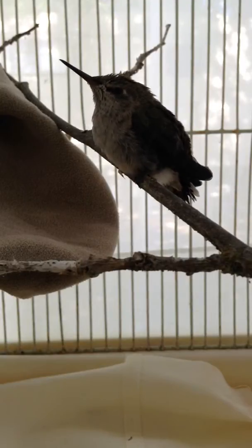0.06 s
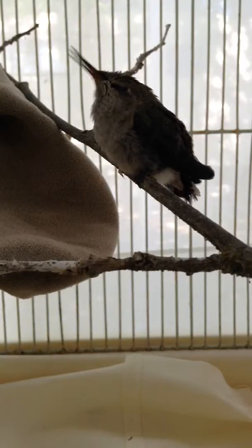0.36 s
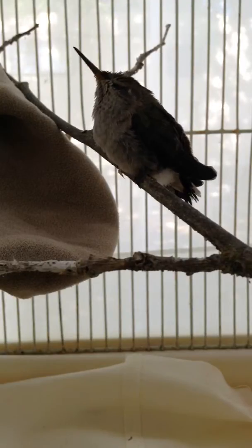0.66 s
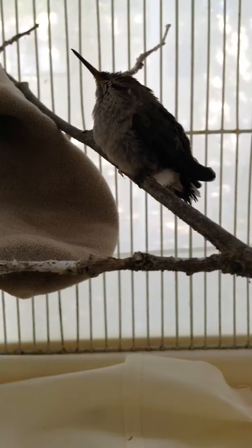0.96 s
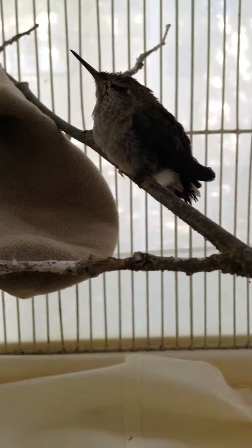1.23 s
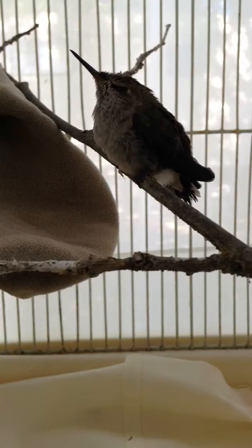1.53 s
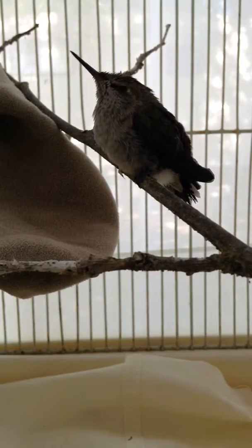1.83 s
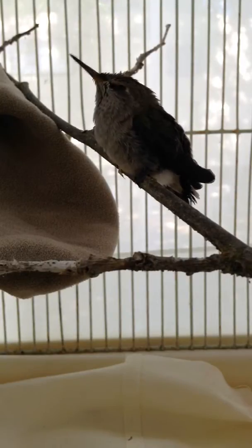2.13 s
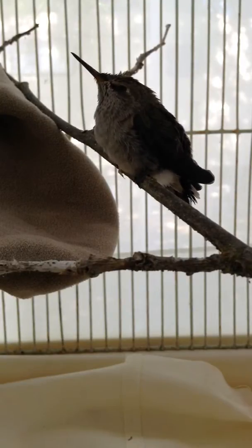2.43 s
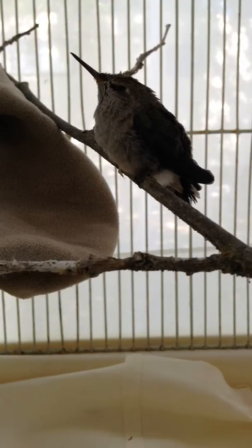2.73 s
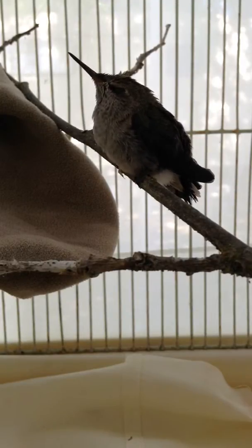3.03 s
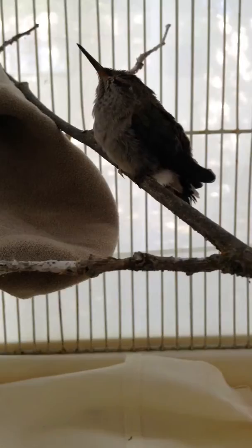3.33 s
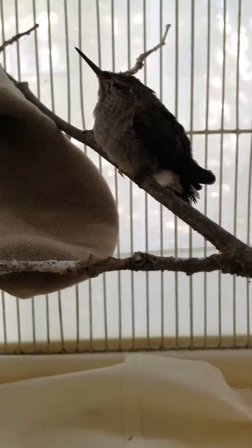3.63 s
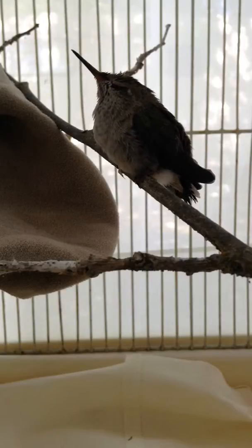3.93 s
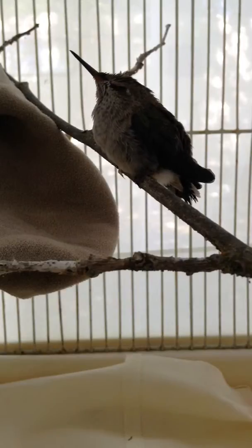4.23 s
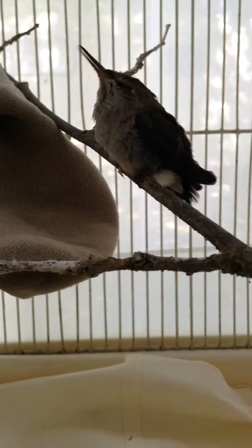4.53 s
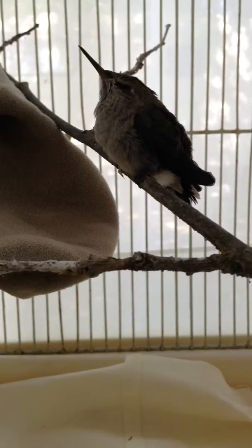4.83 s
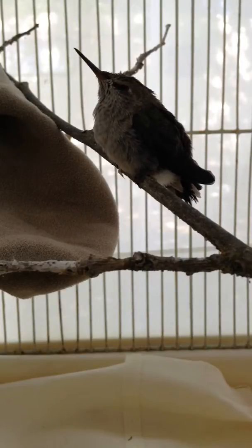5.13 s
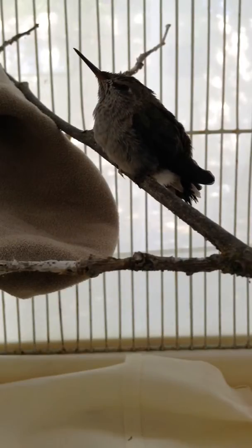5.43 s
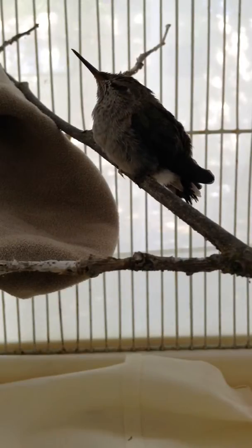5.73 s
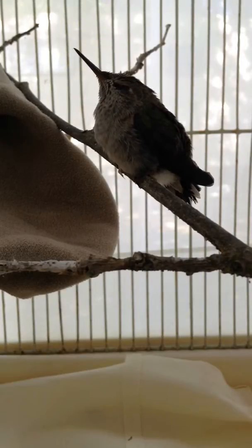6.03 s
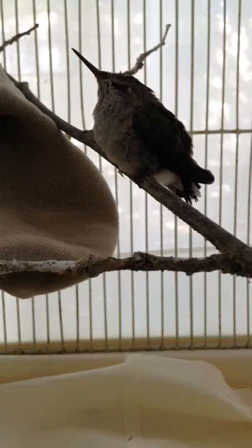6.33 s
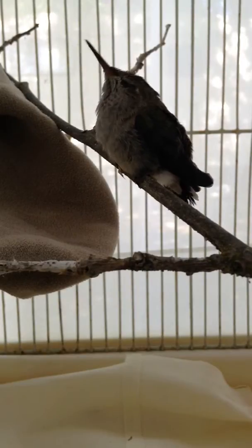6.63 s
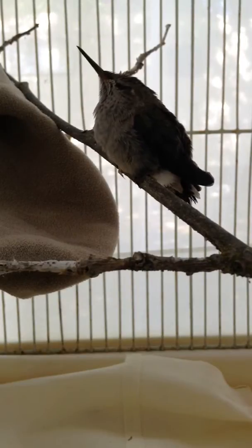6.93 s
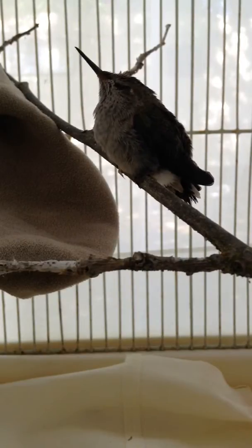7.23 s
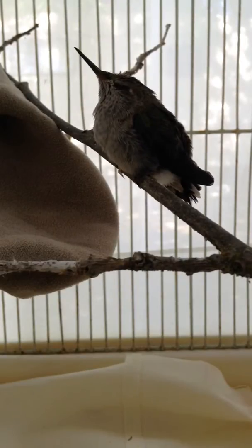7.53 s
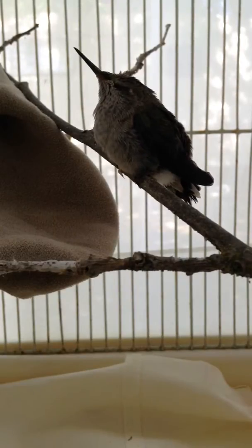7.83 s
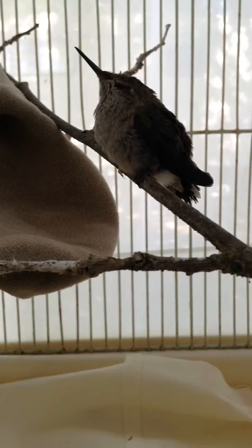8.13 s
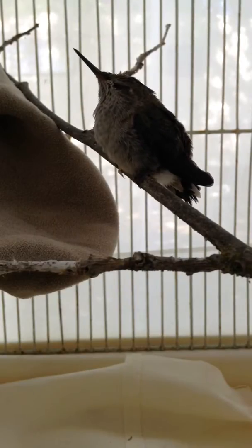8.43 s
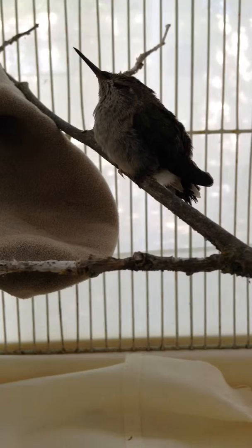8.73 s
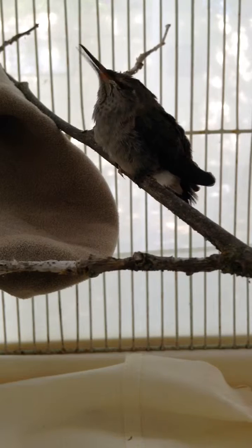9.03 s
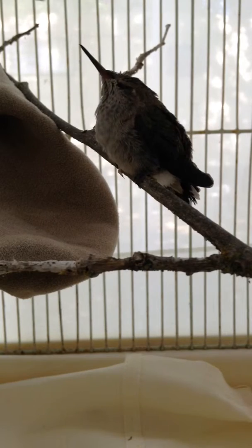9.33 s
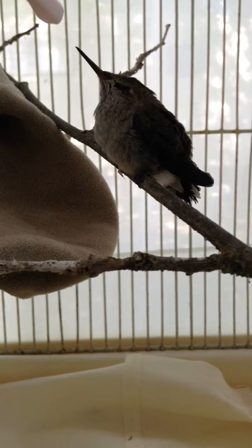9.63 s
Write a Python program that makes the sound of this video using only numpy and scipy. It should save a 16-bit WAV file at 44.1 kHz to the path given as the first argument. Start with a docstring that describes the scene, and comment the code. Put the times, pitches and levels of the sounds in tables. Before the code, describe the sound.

In a quiet, echoing house, a small young bird makes loud, thin, very high single chips, close and almost dry, with pauses between them. A more distant bird joins after about three seconds with four soft, rising rasps, evenly spaced. Underneath are a low hush of air, faint sliding bird whistles and a few slight rustles. Some faint dull bumps and two muffled thuds come late, around the last chip.

```python
"""A quiet, echoing house: close by, a young caged hummingbird gives six piercing chips.
Each is a near-pure tone that swings as the voice starts and sags as the breath runs out.
Farther off another bird answers with four rising calls, chopped into a rasp by uneven pulses.
Thin whistles slide by over a bed of soft air and faint hums from outside.
Grainy noise makes the dry rustles, muffled bands of noise the dull bumps and two heavier thuds."""
import sys
import numpy as np
from scipy import signal
from scipy.fft import rfft, irfft
from scipy.io import wavfile

SR = 44100
rng = np.random.default_rng(int(sys.argv[2]) if len(sys.argv) > 2 else 0)


def log_audio(samples):
    """Write samples as a 16-bit WAV file to the path given in sys.argv[1]."""
    # one column per channel
    frames = np.atleast_2d(samples).T
    # limit to full scale, then quantise
    limited = np.clip(frames, -1, 1)
    pcm = np.round(limited * 32767).astype(np.int16)
    wavfile.write(sys.argv[1], SR, pcm)


N = 430857

# Levels in the tables are set ahead of the filters and the faders in scene().
# reverb time of the house: f/Hz, t60/s
ROOM_DECAY = [(200, 0.7), (1000, 1.5), (3000, 1.004), (4500, 0.89), (6000, .52), (7600, 0.32),
              (10000, 0.53), (15000, 0.2)]
# narrow room resonances: f/Hz, level/dB, t60/s
ROOM_MODES = [(2690, 0.5, 1.1), (2786, -4, 1), (2917, -0.5, 1.2), (2963, -3, 1.1), (3160, -4, 1.1),
              (3144, 5, 1.3), (3199, -2, 1.2)]
# EQ of the air bed: f/Hz, level/dB
AIR_EQ = [(20, -79.5), (50, -36), (100, -16), (165, -1.5), (260, -1.5), (380, -6.5), (560, -8.5),
          (780, -4.5), (1070, 0), (1600, -7.3), (2500, -10.5), (4000, -16), (5500, -19.5), (15000, -24)]
# faint hums outside: t/s, length/s, level/dB, first f/Hz, last f/Hz, mid-glide bow/Hz
HUMS = [(2.66, 0.27, -68, 531, 539, 0.5), (2.7, 1.9, -80.5, 539, 448, -21.5),
        (3.6, 3.0, -78.5, 166.9, 169.4, 0)]
# distant slurred whistles: t/s, length/s, level/dB, first f/Hz, last f/Hz, mid-glide bow/Hz
WHISTLES = [(0.0, 0.11, -59, 3480, 3340, -51), (.93, 0.12, -57.5, 5920, 5980, -1),
            (1.132, 0.17, -52, 5070, 4070, -200), (1.295, 0.23, -52.5, 3897, 3820, -130),
            (1.536, 0.21, -68, 3460, 3310, -38.5), (1.946, 0.39, -66, 4050, 3650, -29),
            (3.017, 0.43, -64.5, 4350, 3750, 108), (3.141, .14, -54.5, 5350, 4670, -100),
            (3.27, 0.19, -52, 5020, 4350, -100), (3.527, 0.14, -56, 4150, 3610, -22.5),
            (4.153, .11, -62, 3400, 3500, 400), (4.26, .1, -63, 3450, 3750, 280),
            (5.125, 0.12, -53, 4010, 3810, -52), (5.241, .1, -59.5, 3920, 4270, 29),
            (5.307, 0.14, -59.5, 4190, 3300, -370), (6.117, 0.055, -54.5, 3640, 4330, 82),
            (6.195, 0.13, -61, 4370, 3900, 111.5), (6.924, .34, -59.5, 4530, 3690, -180),
            (7.611, .23, -57, 3000, 3330, 230), (7.83, .19, -63, 3330, 2680, -170),
            (8.222, 0.43, -70, 3590, 4260, -4), (8.541, 0.15, -63.5, 3790, 3230, -150),
            (8.932, 0.19, -66, 4800, 4870, 81.5), (9.08, 0.2, -58.5, 4850, 4400, 3),
            (9.31, 0.38, -64, 4150, 3334, -130)]
# light bumps: t/s, boom level/dB, knock level/dB, knock rise/s, knock f/Hz, knock width/octaves
BUMPS = [(1.96, -76, -63, 0.037, 768, 0.16), (6.853, -65, -58.5, 0.004, 962, .39),
         (6.925, -64.5, -65, 0.017, 768, .08), (7.185, -63, -65, 0.017, 936, .42),
         (7.491, -66, -77.5, .02, 850, .3), (9.628, -64, -73, 0.022, 850, .3)]
# heavy thuds: t/s, level/dB, extra weight/dB
THUDS = [(8.765, -52, -3.5), (9.268, -52, 1)]
# layers of a thud (first touch, clack, body, lingering rumble, hollow note):
# delay/s, level/dB, share of the extra weight, rise/s, t60/s, f/Hz, width/octaves
THUD_LAYERS = [(-0.043, -9.5, 0.065, .019, 0.2, 207, .39), (-0.01, -2, 0.19, 0.026, 0.39, 890, .42),
               (0.038, 1.8, 1, .02, .25, 340, 0.61), (0.083, -5, 0.3, 0.028, 1, 780, 0.84),
               (0.11, -8.5, 0.95, 0.031, .7, 655, 0.089)]
# dry rustles: t/s, level/dB, rise/s, t60/s, centre f/Hz
RUSTLES = [(0.059, -52.5, 0.044, 0.34, 4530), (.24, -59.5, 0.12, 0.35, 3020), (0.749, -64, .2, 0.33, 3720),
           (0.966, -53.5, 0.057, 0.18, 4900), (1.013, -52.5, .02, 0.06, 3280),
           (1.159, -60, .012, 0.16, 2370), (2.049, -67.5, .04, 0.81, 3420), (2.586, -46, 0.013, 0.21, 4040),
           (2.952, -68, 0.0087, 0.21, 5550), (4.148, -63.5, 0.026, 0.47, 3410),
           (5.198, -67.5, 0.028, 0.18, 4800), (6.593, -60, 0.033, 0.27, 4300),
           (8.14, -72.5, 0.45, 1.14, 3034), (9.118, -50, 0.0089, 0.34, 4200),
           (9.717, -60.5, 0.031, .3, 4100)]
# EQ of a rustle: ratio to its centre frequency, level/dB
RUSTLE_EQ = [(.15, -32), (.4, -14.5), (.62, -8.5), (.85, -5), (1.12, -2.5), (1.3, -9.5), (1.45, -18.5),
             (2.3, -28), (3.6, -42)]
# the far bird's calls: t/s, length/s, level/dB, top f/Hz, brightness/dB per harmonic, yip level/dB
RASPS = [(3.186, 0.3, -41.5, 3026, 2, -41), (4.441, .300, -37, 3117, 4, -42.5),
         (5.733, .315, -38, 3090, 4, -41.5), (6.988, .305, -39.5, 3081, 4.5, -40.5)]
# short squeaks around the starts of two calls: t/s, length/s, f/Hz, level/dB
SQUEAKS = [(4.406, 0.013, 5760, -39.5), (5.693, 0.026, 5780, -57), (5.769, 0.033, 5800, -55)]
# resonances of the far bird's throat: f/Hz, level/dB
THROAT_EQ = [(1600, -9), (2050, -3.5), (2600, 0), (2950, -1), (3150, 4), (3400, 1), (4200, -1), (5400, 4),
             (6200, -1.5), (6900, -24.5), (7700, 6), (8500, 4), (9400, -7), (10500, -16.5), (12400, 0)]
# the hummingbird's chips, and the faint overload ticks heard on each:
# t/s, length/s, level/dB, f/Hz, overload tick level/dB, three pitch swings/Hz
CHIPS = [(0.4617, 0.082, -3, 7593, -58, 620, -43, 71.5),
         (2.0710, 0.084, -2.5, 7633, -58.5, 195, -320, -2.5),
         (3.253, 0.092, -2.5, 7615, -65.5, 50.5, -350, 4),
         (4.4978, 0.099, -3.5, 7577, -55.5, 155, -420, 245.5),
         (6.503, 0.089, -4.5, 7630, -60.5, 614, -560, 381.5),
         (9.011, 0.086, -1.5, 7630, -64.5, -57, 204, 14)]
# timing of the three swings within a chip: t/s, width/s
SWING_TIMES = [(.001, .0025), (.0055, .003), (0.013, .0055)]
# the bill's colour on a chip's octave: f/Hz, level/dB
BILL_EQ = [(13500, -14), (14400, -1.5), (15200, 2.5), (15600, -4), (16100, -28)]


def amp(db):
    """Decibels to gain."""
    return 10 ** (np.asarray(db) / 20)


def unit_rms(x):
    """Scales to rms 1."""
    return x / np.sqrt(np.mean(x ** 2) + 1e-20)


def curve(points, hz):
    """Reads a table on a log-frequency axis."""
    f, value = np.transpose(points)
    return np.interp(np.log(hz + 1e-6), np.log(f), value)


def hump(t, centre, width):
    """A bell-shaped envelope of height 1."""
    return np.exp(-((t - centre) / width) ** 2)


def hit_envelope(rise, t60):
    """One second of envelope: linear attack, exponential decay."""
    t = np.arange(SR) / SR
    return np.minimum(t / rise, 1) * amp(-60 * np.maximum(t - rise, 0) / t60)


def eq(x, colour):
    """Filters x by colour(Hz), given in dB."""
    hz = np.fft.rfftfreq(len(x), 1 / SR) + 1
    return irfft(rfft(x) * amp(colour(hz)), len(x))


def noise(size, colour):
    """Noise of rms 1, shaped by colour(Hz) in dB."""
    return unit_rms(eq(rng.standard_normal(size), colour))


def wander(size, rate_hz):
    """Random modulation that rolls off above rate_hz."""
    return noise(size, lambda hz: -20 * np.log10(1 + (hz / rate_hz) ** 2))


def add(mix, start, sound):
    """Lays a sound into the mix at start, in seconds."""
    part = mix[max(round(start * SR), 0):][:len(sound)]
    part += sound[:len(part)]


def track(source, cues):
    """One sound for each row of a cue table."""
    mix = np.zeros(N)
    for cue in cues:
        add(mix, *source(*cue))
    return mix


def reflect(x, echo_db, spread_s, count=14):
    """Adds early reflections off nearby surfaces: glides ripple and fast pulses blur."""
    out = x.copy()
    for delay, sign in zip(rng.uniform(0.0024, spread_s, count), rng.choice([-1, 1], count)):
        add(out, delay, sign * amp(echo_db) * x)
    return out


def reverb(x, predelay_s):
    """The diffuse tail of the house; each band dies at its own speed."""
    taps = rng.standard_normal(SR) * (rng.random(SR) < .2) * (np.arange(SR) > predelay_s * SR)
    hz, t, bands = signal.stft(taps, SR, nperseg=256)
    decay = amp(-60 * t / curve(ROOM_DECAY, hz)[:, None])
    tail = signal.istft(bands * decay, SR, nperseg=256)[1]
    return signal.fftconvolve(x, tail / np.linalg.norm(tail))[:N]


def room_ring(x):
    """Narrow room resonances that sing on after a call."""
    t = np.arange(SR) / SR
    modes = np.zeros(SR)
    for hz, db, t60 in ROOM_MODES:
        unity_gain = 2 * np.log(1000) / (t60 * SR)
        modes += unity_gain * amp(db - 60 * t / t60) * np.sin(2 * np.pi * hz * t)
    return signal.fftconvolve(x, modes)[:N]


def air():
    """Room tone: a soft, dark noise bed whose level drifts slowly."""
    return amp(-67.5 + .5 * wander(N, 0.67)) * noise(N, lambda hz: curve(AIR_EQ, hz))


def gliding_tone(start, length, db, first_hz, last_hz, bow_hz):
    """A whistle or hum: one unsteady tone on a curved glide, hoarser when it is softer."""
    attack, release, flutter_db = .15, .3, 2.8  # attack and release are shares of the length
    progress = np.linspace(0, 1, int(length * SR))
    hz = first_hz + (last_hz - first_hz) * progress + bow_hz * (1 - (2 * progress - 1) ** 2)
    envelope = np.minimum(progress / attack, 1) * np.minimum((1 - progress) / release, 1)
    hoarseness = np.clip(-(db + 52) / 12, 0, 1)
    waver = .01 * wander(len(hz), 120) + .022 * hoarseness * wander(len(hz), 350)
    phase = 2 * np.pi * np.cumsum(hz * (1 + waver)) / SR
    flutter = amp(flutter_db * wander(len(hz), 40))
    return start, amp(db) * envelope * unit_rms(np.sin(phase) * flutter)


def muffled_hit(db, rise, t60, centre_hz, octaves):
    """A blow heard through walls: a resonant band of noise with a soft attack and no top end."""
    body = noise(SR, lambda hz: -20 * np.log10(1 + (np.log2(hz / centre_hz) / octaves) ** 2 / 2))
    body = eq(body, lambda hz: -10 * np.log10(1 + (160 / hz) ** 10 + (hz / 3000) ** 4))
    return amp(db) * body * hit_envelope(rise, t60)


def bump(start, boom_db, knock_db, rise, centre_hz, octaves):
    """A light bump: a low boom layered with a hollow knock."""
    boom = muffled_hit(boom_db, rise=.025, t60=.23, centre_hz=242, octaves=.16)
    knock = muffled_hit(knock_db, rise, t60=.13, centre_hz=centre_hz, octaves=octaves)
    return start, boom + knock


def thuds():
    """Heavy thuds, each a staggered stack of muffled hits."""
    mix = np.zeros(N)
    for start, db, weight_db in THUDS:
        for delay, layer_db, share, *shape in THUD_LAYERS:
            add(mix, start + delay, muffled_hit(db + layer_db + share * weight_db, *shape))
    return mix


def rustle(start, db, rise, t60, centre_hz):
    """A dry, grainy scrape that swells and dies."""
    grain = amp(3 * wander(SR, 130))
    scrape = unit_rms(grain * noise(SR, lambda hz: curve(RUSTLE_EQ, hz / centre_hz)))
    return start, amp(db) * scrape * hit_envelope(rise, t60)


def squeak(start, length, hz, db):
    """A brief pure tone that swells and fades."""
    t = np.arange(int(length * SR)) / SR
    return start, amp(db) * np.sin(2 * np.pi * hz * t) * np.sin(np.pi * t / length)


def yip(rasp_start, db):
    """The quick, rough upward pickup to a rasp, with weak harmonics."""
    lead_s, length, from_hz, to_hz = .044, .021, 2000, 2830
    t = np.arange(int(length * SR)) / SR
    progress = t / length
    hz = from_hz + (to_hz - from_hz) * (1 - (1 - progress) ** 3)
    swell_db = -4.5 + 5.5 * np.sin(np.pi * progress)
    phase = 2 * np.pi * np.cumsum(hz * (1 + 0.043 * wander(len(t), 560))) / SR
    tone = sum(amp(level) * np.sin(k * phase) for k, level in enumerate([0, -21, -31], 1))
    rough_tone = unit_rms(tone * amp(3.5 * wander(len(t), 300)))
    return rasp_start - lead_s, amp(db + swell_db) * rough_tone * signal.windows.tukey(len(t), .06)


def rasp(start, length, db, top_hz, bright_db, pulse_hz=118):
    """The far bird: a rising, brightening note chopped into uneven pulses, each with a pitch swoop."""
    t = np.arange(int(length * SR)) / SR
    progress = t / length
    # the voice pushes off, catches for an instant, then swells late in the call
    push_db = 4 * np.exp(-t / .016)
    catch_db = -17 * hump(t, .02, .0068)
    swell_db = -4.5 + 5.5 * hump(progress, .77, .22)
    pitch_ratio = .85 + .15 * np.minimum(progress / .76, 1) ** 1.3
    pulse_phase = 2 * np.pi * np.cumsum(pulse_hz * (1 + .25 * wander(len(t), 80))) / SR
    pulses = unit_rms(np.exp(1.3 * np.cos(pulse_phase) + 0.22 * wander(len(t), 100)))
    swoop = 0.027 * np.sin(pulse_phase) + .024 * wander(len(t), 270)
    phase = 2 * np.pi * np.cumsum(top_hz * pitch_ratio * (1 - swoop / pitch_ratio ** 3)) / SR
    tilt_db = -19.5 + 13.5 * progress ** 3 + bright_db
    harmonics_db = [0, tilt_db - 1.5, 2 * tilt_db + 4, 2 * tilt_db - 20]
    tone = sum(amp(level) * np.sin(k * phase) for k, level in enumerate(harmonics_db, 1))
    fades = np.clip((length - t) / .03, 0, 1) * signal.windows.tukey(len(t), .01)
    return start, amp(db + push_db + catch_db + swell_db) * pulses * tone * fades


def overload_ticks(t, count=5, from_s=.014, to_s=.032):
    """Faint overload ticks heard on each loud chip: a few dull clicks at random early moments."""
    clicks = np.zeros(len(t))
    clicks[np.searchsorted(t, rng.uniform(from_s, to_s, count))] = 1
    return unit_rms(eq(clicks, lambda hz: -10 * np.log10((1 + hz / 250) * (1 + (hz / 9000) ** 4))))


def chip(start, length, db, pitch_hz, tick_db, *swings_hz):
    """The hummingbird: a near-pure note that swings at the onset, settles, sags and gains an octave."""
    attack_s, release_s = .015, .011
    t = np.arange(int(length * SR)) / SR
    progress = t / length
    attack = np.sin(np.pi / 2 * np.minimum(t / attack_s, 1))
    release = np.minimum((length - t) / release_s, 1)
    envelope = attack * release * (1 - .75 * progress ** 2) * signal.windows.tukey(len(t), .025)
    sag_hz = 374 * progress ** 3  # the breath runs out
    swing_hz = sum(hz * hump(t, at, width) for hz, (at, width) in zip(swings_hz, SWING_TIMES))
    hz = pitch_hz - sag_hz + swing_hz + 18 * wander(len(t), 90)
    onset_strain = 0.057 * hump(t, 0, .028) * wander(len(t), 380)
    phase = 2 * np.pi * np.cumsum(hz) / SR + onset_strain
    octave_db = -16.5 - 13.5 * hump(t, .012, .013)  # dips while the chip is strongest
    octave = eq(amp(octave_db) * release * np.sin(2 * phase), lambda f: curve(BILL_EQ, f))
    quaver_db = 1.2 * progress * noise(len(t), lambda f: -10 * np.log10(1 + (f / 150) ** 8))
    tone_with_ticks = np.sin(phase) + octave + amp(tick_db) * overload_ticks(t)
    return start, amp(db + quaver_db) * envelope * tone_with_ticks


def scene():
    """The mono mix: chips up front and almost dry; calls, whistles, rustles and bumps set back, wet."""
    chips = amp(0.07) * reflect(track(chip, CHIPS), echo_db=-28.5, spread_s=.014)
    rasps = track(rasp, [cue[:-1] for cue in RASPS])
    yips = track(yip, [(cue[0], cue[-1]) for cue in RASPS])
    calls = eq(rasps + yips, lambda hz: curve(THROAT_EQ, hz)) + track(squeak, SQUEAKS)
    whistles = track(gliding_tone, WHISTLES)
    rustles = track(rustle, RUSTLES)
    bumps = track(bump, BUMPS) + thuds()
    direct = chips + amp(4) * bumps + amp(1) * rustles
    direct += amp(-1.5) * reflect(calls, echo_db=-19.5, spread_s=.033)
    direct += amp(-3) * reflect(whistles, echo_db=-16, spread_s=.05)
    far_send = amp(-13) * whistles + amp(-7.5) * rustles + amp(-4.5) * calls + amp(-0.5) * bumps
    wet = reverb(amp(-31.5) * chips, predelay_s=.02) + reverb(far_send, predelay_s=.0069)
    wet += amp(0.5) * room_ring(calls)
    bed = air() + track(gliding_tone, HUMS)
    return (direct + wet + bed)[None]


def record(dry):
    """Master chain: a peak limiter snaps down on loud chips and recovers slowly, then a high cut."""
    ceiling_db, recovery_db_per_s, cutoff_hz = -3.1, 25, 16400
    over_db = np.maximum(20 * np.log10(abs(dry[0]) + 1e-9) - ceiling_db, 0)
    recovery_db = np.arange(N) / SR * recovery_db_per_s
    reduction_db = np.maximum.accumulate(over_db + recovery_db) - recovery_db
    high_cut = signal.firwin(511, cutoff_hz, window=("kaiser", 9), fs=SR)
    return signal.oaconvolve(dry / amp(reduction_db), high_cut[None], "same")


dry = scene()
out = record(dry)
log_audio(out)
```